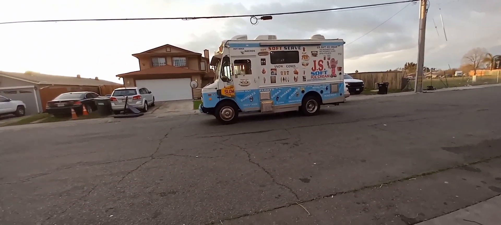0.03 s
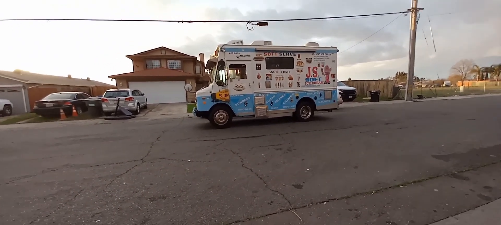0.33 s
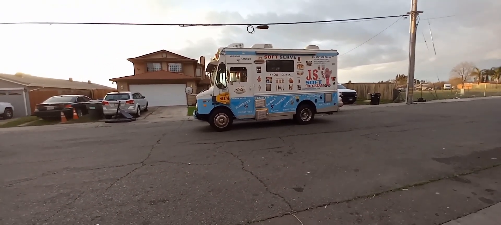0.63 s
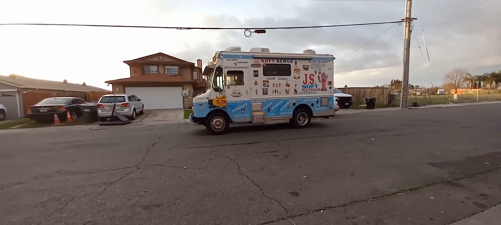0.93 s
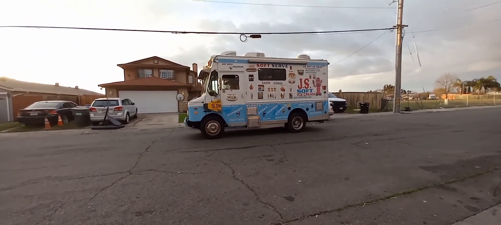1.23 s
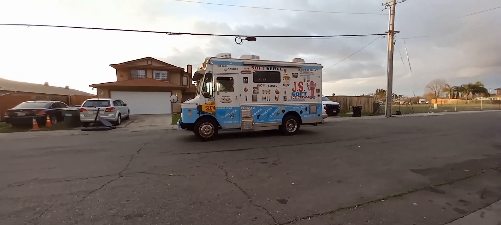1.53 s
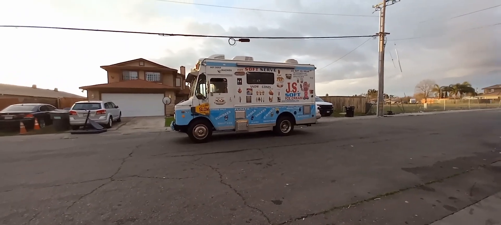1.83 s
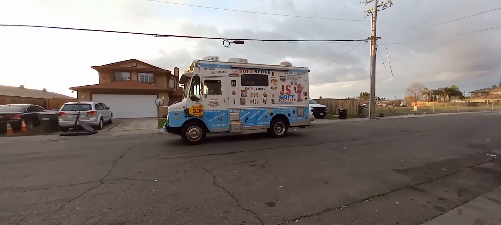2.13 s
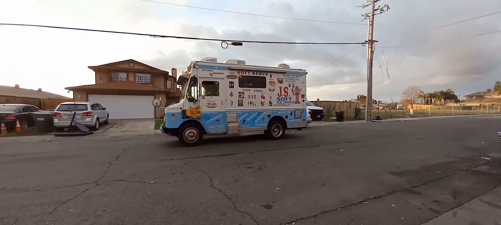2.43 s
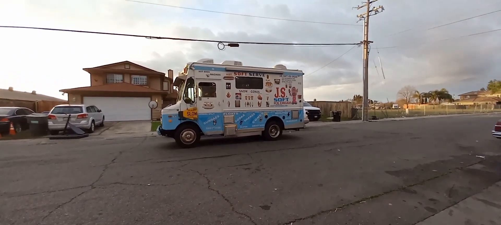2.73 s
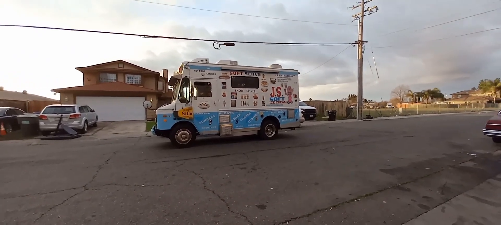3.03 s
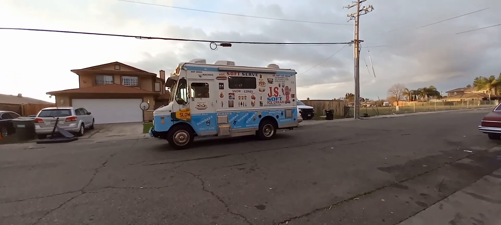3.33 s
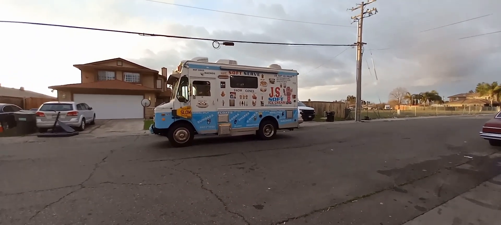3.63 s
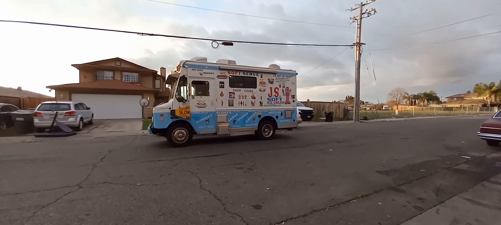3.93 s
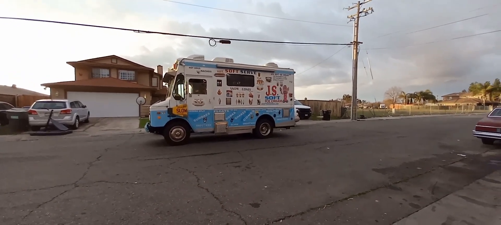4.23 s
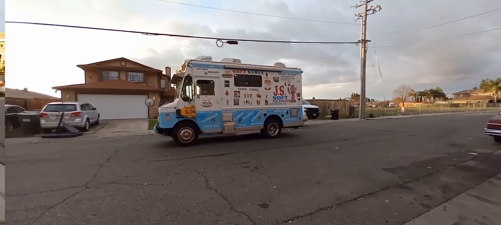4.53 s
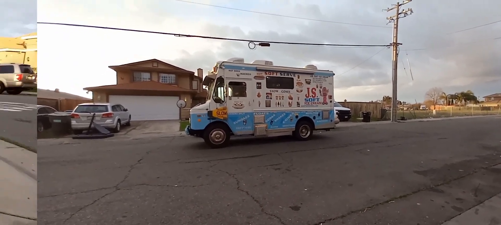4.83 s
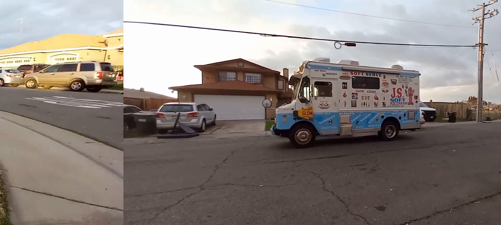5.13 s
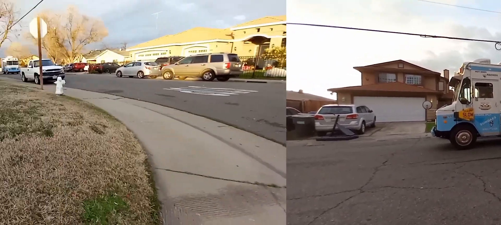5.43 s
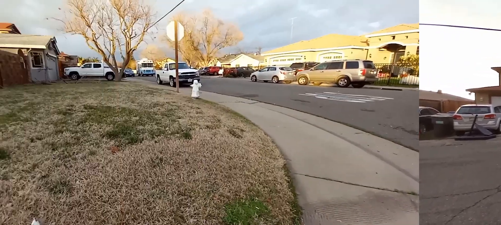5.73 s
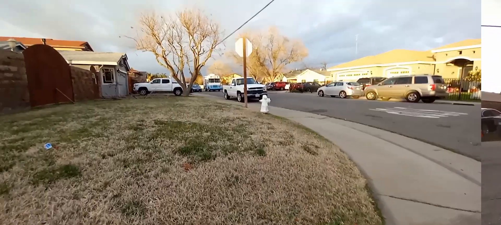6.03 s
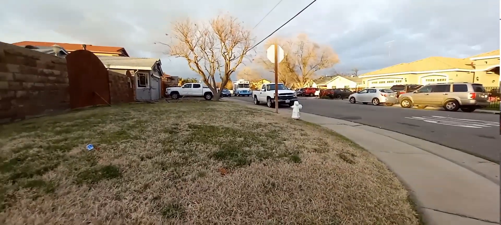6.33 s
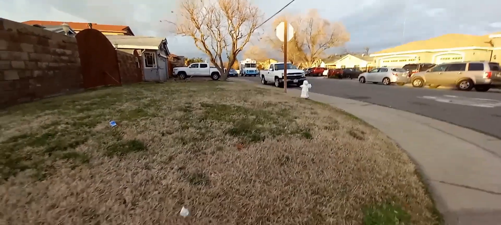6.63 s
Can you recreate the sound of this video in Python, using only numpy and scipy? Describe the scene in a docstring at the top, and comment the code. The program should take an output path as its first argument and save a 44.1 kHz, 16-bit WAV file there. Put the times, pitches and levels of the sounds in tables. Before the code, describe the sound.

An ice cream truck idles across a residential street, its low exhaust drone throbbing steadily under a light valve clatter and a faint whine. A few small ticks and one short finger bump touch the hand-held microphone. After about four seconds the engine fades away into an open street corner, where road noise swells, grass rustles faintly and gusts of wind thump against the microphone.

```python
"""Idling V8 van, then a windy corner

A van idles across a residential street. Eight uneven firings per cycle make a throbbing exhaust drone,
the block whines faintly, and valve taps clatter and set the covers ringing. Fingers tick and bump on a
hand-held camera. The engine fades as the scene changes to an open street corner, where turbulent wind
buffets the microphones, grass rustles and the rush of road noise swells."""
import sys
import numpy as np
from scipy import signal
from scipy.fft import rfft, irfft, next_fast_len
from scipy.io import wavfile

SR = 44100
rng = np.random.default_rng(int(sys.argv[2]) if len(sys.argv) > 2 else 0)


def pcm_store(signal):
    """Save signal as 16-bit PCM."""
    levels = np.round(np.clip(np.atleast_2d(signal), -1, 1) * 32767)
    wavfile.write(sys.argv[1], SR, levels.astype(np.int16).T)


N = 304290
CYCLE_HZ, START_CYCLE = 14.385, 0.036   # four-stroke cycles of a steady idle
DISSOLVE_START_S, DISSOLVE_S = 4.154, 2.15   # the street gives way to the corner

# The eight firings of a cycle. Each row: strength in dB, lateness in firing intervals.
FIRINGS = [(-3, 0.052), (-5, 0.021), (-1.5, 0.017), (0.3, -0.056), (1, -0.0024), (3, -0.031), (1.5, 0.0089),
           (-0.25, -0.042)]
# Stereo balance of the engine. Each row: frequency in Hz, left minus right in dB.
ENGINE_SIDE = [(100, 0.5), (300, -0.5), (800, -1.5), (1200, 0.5), (2200, 1), (2900, -1), (3900, 0),
               (4700, 7.5), (6000, 18.5), (6800, 25), (8200, 38.5), (9600, 17.5), (11000, 10.5),
               (15000, 15.5)]


def exhaust(cycle, t, share, waver_db):
    """Periodic gas pulses boom at the firing rate; uneven cylinders add harmonics that beat as a throb."""
    # Deep exhaust harmonics. Each row: multiple of the cycle rate, level in dB.
    lines = [(4, -27), (5, -35), (6, -36), (7, -32), (8, -15), (9, -28), (10, -35), (11, -35), (12, -29),
             (13, -35), (14, -38), (15, -41), (16, -39)]
    boom = engine_lines(cycle, [row for row in lines if row[0] == len(FIRINGS)], scatter=0)
    throb = engine_lines(cycle, [row for row in lines if row[0] != len(FIRINGS)], scatter=0.16)
    # The boom fades first, then swells once more before it is gone.
    boom_gain = np.hypot(share ** 1.01, bell(t, peak_s=6.15, length_s=0.41, db=-8))
    return (boom_gain * boom + share ** 0.8 * throb) * from_db(waver_db * drift(5.9))


def growl(cycle, waver_db, puff_depth):
    """The tail pipe resonates a little after the throb, with a puff of turbulence at every firing."""
    # Harmonics ringing in the pipe. Each row: multiple of the cycle rate, level in dB.
    pipe = [(17, -27.5), (18, -30), (20, -37), (22, -47), (23, -46), (24, -37), (26, -38), (27, -37.5)]
    # Exhaust turbulence. Each row: frequency in Hz, spectral level in dB.
    rumble = [(20, -71), (40, -69), (55, -63.5), (80, -39.5), (115, -50.5), (160, -45.5), (260, -51),
              (370, -54), (460, -63), (600, -61), (800, -55.5), (920, -63.5), (1100, -67), (1500, -100.5)]
    ringing = engine_lines(cycle, pipe, scatter=0.34, lag_cycles=0.22) * from_db(waver_db * drift(17))
    puffs = 1 + puff_depth * np.cos(2 * np.pi * len(FIRINGS) * cycle)
    return ringing + air_noise(rumble, ENGINE_SIDE, puffs)


def whine(cycle, waver_db, slip_cycles, groups=4):
    """Forced vibration of the block: groups of high harmonics waver apart in level and phase."""
    # Harmonics of the block and its drives. Each row: multiple of the cycle rate, level in dB.
    lines = [(36, -44), (42, -47), (45, -50), (48, -47), (50, -50), (52, -45), (54, -38), (57, -48),
             (59, -46), (60, -40), (61, -45), (64, -46), (72, -52)]
    out = np.zeros((2, N))
    for k in range(groups):
        tones = engine_lines(cycle + slip_cycles * drift(2), lines[k::groups], scatter=2.1)
        out += tones * from_db(waver_db * drift(6.6))
    return out


def engine_lines(cycle, lines, scatter, lag_cycles=0):
    """Fourier series of a cycle: the firings set each phase; pipe and street scatter it (in radians)."""
    strength_db, lateness = np.transpose(FIRINGS)
    fired = (np.arange(len(FIRINGS)) + lateness) / len(FIRINGS)
    place = np.linspace(0, 1, 4096)
    wave = np.zeros((2, len(place)))
    for multiple, db in lines:
        phase = np.angle(np.sum(from_db(strength_db) * np.exp(-2j * np.pi * multiple * fired)))
        phase += scatter * rng.standard_normal()
        line = np.sqrt(2) * from_db(db) * np.cos(2 * np.pi * multiple * (place - lag_cycles) + phase)
        wave += pan(at_hz(ENGINE_SIDE, multiple * CYCLE_HZ)) * line
    return np.array([np.interp(cycle % 1, place, channel) for channel in wave])


def clatter(cycle, share, ring_db, ring_lag_cycles):
    """Valve impacts rattle over the gas hiss and excite the covers' modes, which fade out later."""
    # Valve gear and gas hiss. Each row: frequency in Hz, spectral level in dB.
    gas = [(700, -102), (1150, -72.5), (1400, -66.5), (1900, -71.5), (2550, -70), (3300, -71.5),
           (3800, -76), (5100, -76.5), (6100, -82.5), (6750, -88), (7900, -81), (8600, -87.5), (9600, -101),
           (11000, -98), (15500, -96)]
    # Modes of the block, valve covers and manifold.
    # Each row: frequency in Hz, bandwidth in Hz, relative level in dB, left minus right in dB.
    modes = [(852, 38, -42, -2), (1333, 30, -51.5, 10), (1475, 30, -49, 5), (2241, 89, -45.5, 0),
             (2780, 82, -53.5, 2.5), (2876, 75, -46.5, -6), (3300, 190, -54.5, 3), (4613, 65, -53.5, 13),
             (7670, 150, -63.5, 30)]
    taps = valve_taps(cycle, rise_s=0.0036, t60_s=0.044, uneven_db=0.5)
    out = share ** 0.9 * air_noise(gas, ENGINE_SIDE, taps)
    answer = np.interp(cycle - ring_lag_cycles, cycle, taps)
    rattle = answer ** 1.9 * rng.standard_normal(N)   # the metal answers the taps more than the hiss
    for hz, width_hz, db, side_db in modes:
        ring = signal.lfilter(*signal.iirpeak(hz, hz / width_hz, fs=SR), rattle)
        ring = signal.lfilter(*signal.iirpeak(hz, 2, fs=SR), ring)   # darkens the valleys between modes
        out += share ** 0.57 * pan(side_db) * from_db(db + ring_db) * ring / ring.std()
    return out


def valve_taps(cycle, rise_s, t60_s, uneven_db):
    """Envelope of the taps, bunched in half of each cycle: incoherent bursts add in power."""
    # Valve impacts. Each row: place in firing intervals, level over the steady hiss in dB.
    taps = [(2.3, 2.5), (3.2, -3), (4.15, 8), (5.15, 4), (6.15, 6.5)]
    power = np.ones(N)
    for place, db in taps:
        count, part = np.divmod(cycle + 1 - place / len(FIRINGS), 1)
        age = part / CYCLE_HZ
        chance = rng.standard_normal(256)[count.astype(int)]
        attack = np.minimum(age / rise_s, 1)   # echoes under the body soften it
        power += attack * from_db(db + uneven_db * chance - 60 * age / t60_s) ** 2
    return np.sqrt(power / power.mean())


def facing(sound, band_hz):
    """Directivity: a band of the treble comes forward as the camera turns."""
    # The turn. Each row: time in seconds, gain outside the band in dB, gain inside it in dB.
    turn = [(0, 1, -3), (2.9, -.5, -0.6), (4.3, 0.3, 1.1)]
    times, *gains_db = np.transpose(turn)
    outside, inside = [from_db(np.interp(np.arange(N) / SR, times, db)) for db in gains_db]
    bright = signal.sosfiltfilt(signal.butter(2, band_hz, "band", fs=SR, output="sos"), sound)
    return outside * (sound - bright) + inside * bright


def wind(t, flutter, buffet):
    """Turbulent pressure on the microphone ports: gusts add in power to a rising breeze."""
    # Deep buffeting and higher flutter. Each row: frequency in Hz, spectral level in dB.
    buffet_spectrum = [(20, -69), (40, -71), (62, -44), (110, -42), (170, -49.5), (300, -58.5),
                       (600, -112.5)]
    flutter_spectrum = [(100, -71), (200, -52.5), (270, -43.5), (330, -46.5), (450, -65), (800, -77),
                        (1600, -112.5)]
    thumps = air_noise(buffet_spectrum, drive=np.hypot(buffet, corner_swell(t, db=-2, db_per_s=6)))
    flapping = np.hypot(flutter, corner_swell(t, db=-4.5, db_per_s=6)) * from_db(drift(25))
    return thumps + air_noise(flutter_spectrum, drive=flapping)


def gusts(t, buffet_lag_s):
    """Envelopes of passing eddies: each flutters first and thumps after."""
    # Gusts. Each row: peak time in seconds, length in seconds, flutter in dB, buffet in dB.
    eddies = [(5.908, 0.046, -4, -12), (6.193, .1, -11, -0.5), (6.296, .05, 0.5, -7), (6.361, .05, 0, 5.5),
              (6.533, .05, 2.5, 3.5), (6.696, .045, 2.5, 6), (6.791, .035, -3.5, 6.5)]
    flutter = sum(bell(t, s, length_s, db) for s, length_s, db, _ in eddies)
    buffet = sum(bell(t, s + buffet_lag_s, length_s, db) for s, length_s, _, db in eddies)
    return flutter, buffet


def road(t, flutter):
    """Broadband road noise, lifted by gusts; the roar reaches the right microphone first, the hiss the left."""
    # Roar and hiss of the road. Each row: frequency in Hz, spectral level in dB.
    roar_spectrum = [(200, -103), (450, -55.5), (700, -57), (1000, -54), (1300, -59), (2000, -77),
                     (3000, -76.5), (6000, -105)]
    hiss_spectrum = [(700, -97), (1300, -72.5), (1850, -63), (2600, -71), (3500, -74.5), (4500, -77),
                     (5700, -75.5), (6500, -80), (7300, -92), (8500, -92), (9600, -99), (11500, -92.5),
                     (15000, -99)]
    # Stereo balance of the road. Each row: frequency in Hz, left minus right in dB.
    side = [(500, -1.5), (1000, -3.5), (2000, -5.5), (3500, -8.5), (5700, -14), (7000, -5), (8300, 23),
            (9600, -4), (12000, -9), (15000, -1)]
    rush = np.hypot(corner_swell(t, db=-1.5, db_per_s=8), from_db(-4) * flutter)
    rush *= from_db(1.2 * drift(23))
    roar = air_noise(roar_spectrum, side, rush, coherence=0.74, left_lag_s=0.00052)
    flicker = corner_swell(t, db=-1, db_per_s=3.5) * from_db(0.96 * drift(90))
    return roar + air_noise(hiss_spectrum, side, flicker, coherence=0.38, left_lag_s=-0.000557)


def ticks_and_rustles():
    """Band-passed noise bursts: ticks and scuffs on the camera, a high rustle of grass at the corner."""
    # Ticks, scuffs and rustles. Each row: start in seconds, centre in Hz, bandwidth in Hz, level in dB,
    # rise in seconds, 60 dB decay time in seconds, left minus right in dB.
    bursts = [(0.5448, 12000, 7500, -26.5, .0004, 0.0053, 17), (.548, 12000, 5000, -44, .006, 0.13, 12),
              (3.368, 11000, 4500, -40, .0006, .008, 8), (3.437, 3000, 850, -23.5, 0.0023, 0.026, -22),
              (5.018, 12000, 2500, -55, .002, .03, -4), (5.098, 11800, 1500, -55, .004, .06, -4),
              (5.9, 12000, 6000, -51, .03, .15, -9), (6.079, 2780, 810, -27.5, 0.0066, 0.19, -20),
              (6.082, 960, 400, -25.5, 0.0087, 0.033, -14), (6.44, 12000, 2200, -49, .11, .45, -13),
              (6.62, 13000, 5040, -47, .03, .12, -11)]
    out = np.zeros((2, N))
    for start_s, hz, width_hz, db, rise_s, t60_s, side_db in bursts:
        start = int(start_s * SR)
        age = np.arange(min(SR // 2, N - start)) / SR
        band = signal.butter(2, [hz - width_hz / 2, hz + width_hz / 2], "band", fs=SR, output="sos")
        burst = signal.sosfilt(band, rng.standard_normal(len(age)))
        envelope = np.minimum(age / rise_s, 1) * from_db(-60 * np.maximum(age - rise_s, 0) / t60_s)
        out[:, start:start + len(age)] += pan(side_db) * from_db(db) * envelope * burst / burst.std()
    return out


def finger_bump(t, start_s, db, start_hz, end_hz, sink_s, peak_s, side_db):
    """A knock on one microphone: a damped oscillation that slows as the finger settles."""
    age = np.maximum(t - start_s, 0)
    hz = end_hz + (start_hz - end_hz) * np.exp(-age / sink_s)
    swing = np.sin(2 * np.pi * np.cumsum(hz * (age > 0)) / SR)
    envelope = age / peak_s * np.exp(1 - age / peak_s)
    return pan(side_db) * from_db(db) * envelope * swing


def air_noise(spectrum, side=None, drive=1, coherence=None, left_lag_s=0):
    """Partly coherent stereo noise, shaped in time by `drive`, then coloured by `spectrum`."""
    # By default the channels are alike in the bass only. Each row: frequency in Hz, coherence (0 to 1).
    likeness = [(60, 0.88), (160, 0.96), (270, 0.86), (450, 0.66), (740, 0.83), (1200, 0.067), (2000, 0),
                (3300, 0), (15000, 0)]
    size = next_fast_len(N)
    hz = np.arange(size // 2 + 1) * SR / size
    common, apart = rfft(rng.standard_normal((2, N)) * drive, size)
    if coherence is None:
        coherence = at_hz(likeness, hz)
    both = np.sqrt(1 + coherence) * common + np.sqrt(1 - coherence) * apart * [[1], [-1]]
    both[0] *= np.exp(-2j * np.pi * hz * left_lag_s)
    gain = from_db(at_hz(spectrum, hz)) * pan(0 if side is None else at_hz(side, hz))
    return irfft(both * gain * np.sqrt(SR) / 2, size)[:, :N]


def corner_share(t):
    """Linear crossfade from the street (0) to the corner (1)."""
    return np.clip((t - DISSOLVE_START_S) / DISSOLVE_S, 0, 1)


def corner_swell(t, db, db_per_s):
    """A fade-in times an exponential rise; the gain reaches `db` as the dissolve ends."""
    return corner_share(t) ** 0.68 * from_db(db + db_per_s * (t - DISSOLVE_START_S - DISSOLVE_S))


def bell(t, peak_s, length_s, db):
    """A Gaussian swell."""
    return from_db(db) * np.exp(-2 * ((t - peak_s) / length_s) ** 2)


def drift(rate_hz):
    """Low-passed noise of unit spread: a smooth random wander."""
    step, settle = 40, 2000
    pole = np.exp(-2 * np.pi * rate_hz * step / SR)
    noise = rng.standard_normal(N // step + settle + 2)
    slow = signal.lfilter([1], [1, -2 * pole, pole * pole], noise)[settle:]
    return np.interp(np.arange(N) / step, np.arange(len(slow)), slow / slow.std())


def pan(side_db):
    """Constant-power left and right gains for a level difference."""
    gains = from_db(np.array([[1], [-1]]) * side_db / 2)
    return gains / np.sqrt(np.mean(gains ** 2, axis=0))


def at_hz(points, hz):
    """Interpolation on a log-frequency axis."""
    frequencies, values = np.transpose(points)
    return np.interp(np.log(hz + 1), np.log(frequencies), values)


def from_db(db):
    """Decibels to amplitude ratio."""
    return 10 ** (np.asarray(db) / 20)


def scene():
    """Superposition: one crankshaft times all the engine's sounds; the corner takes over at the end."""
    t = np.arange(N) / SR
    cycle = START_CYCLE + CYCLE_HZ * t
    street_share = 1 - corner_share(t)   # the lower its exponent, the longer a sound lingers
    engine = exhaust(cycle, t, street_share, waver_db=0.04)
    pipe = growl(cycle, waver_db=1.24, puff_depth=0.18)
    block = whine(cycle, waver_db=2.73, slip_cycles=0.0014)
    engine += street_share ** 0.69 * (pipe + block)
    valves = clatter(cycle, street_share, ring_db=1, ring_lag_cycles=0.035)
    engine += facing(valves, band_hz=(3400, 5800))
    flutter, buffet = gusts(t, buffet_lag_s=0.038)
    corner = wind(t, flutter, buffet) + road(t, flutter)
    knock = finger_bump(t, start_s=1.5412, db=-3, start_hz=825, end_hz=110,
                        sink_s=0.0012, peak_s=0.0016, side_db=-31)
    return engine + corner + ticks_and_rustles() + knock


def record(dry):
    """Band limiting: a steep elliptic low-pass removes the highest treble."""
    cutoff_hz = 15700
    return signal.sosfilt(signal.ellip(14, 0.1, 90, cutoff_hz, fs=SR, output="sos"), dry)


dry = scene()
out = record(dry)
pcm_store(out)
```